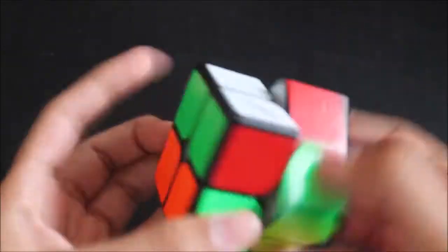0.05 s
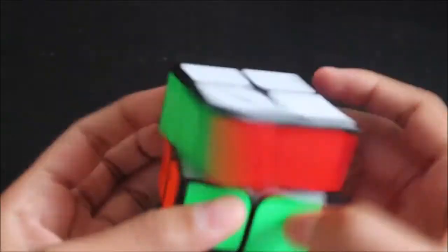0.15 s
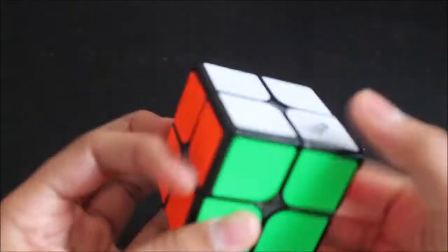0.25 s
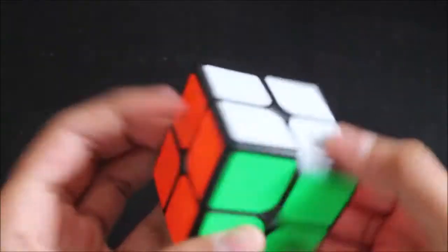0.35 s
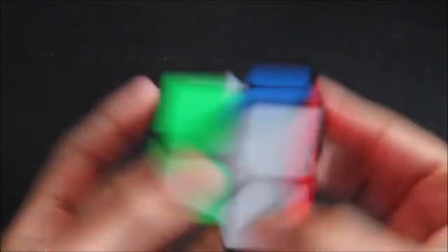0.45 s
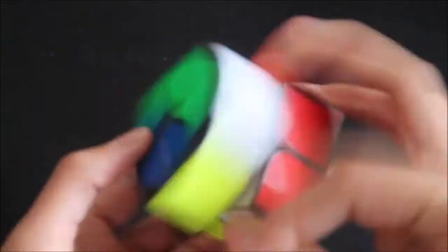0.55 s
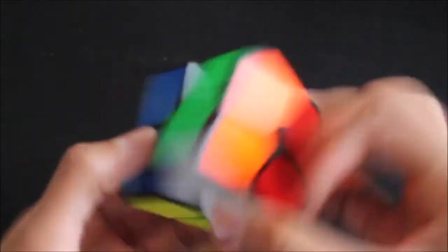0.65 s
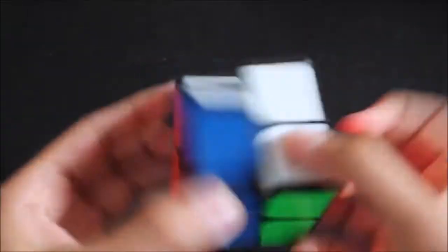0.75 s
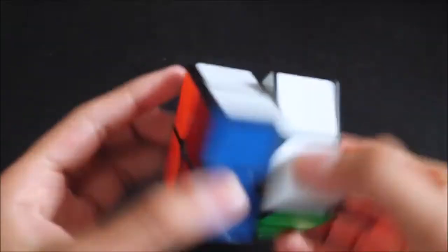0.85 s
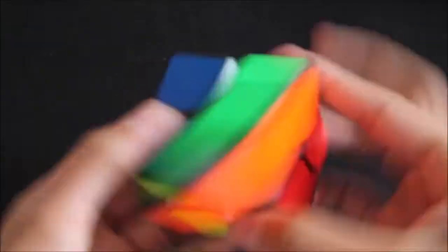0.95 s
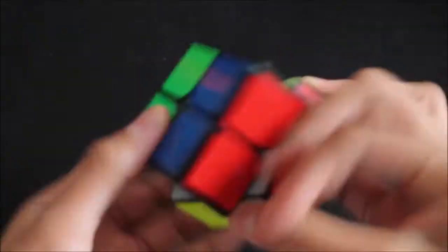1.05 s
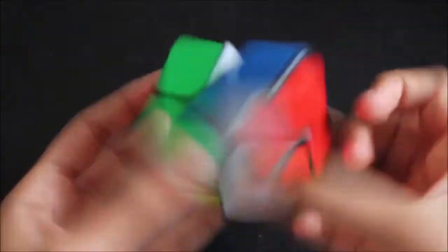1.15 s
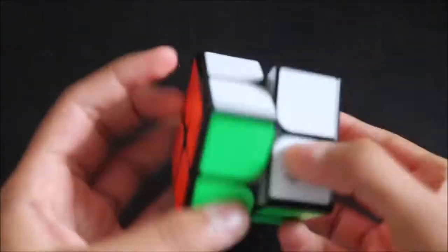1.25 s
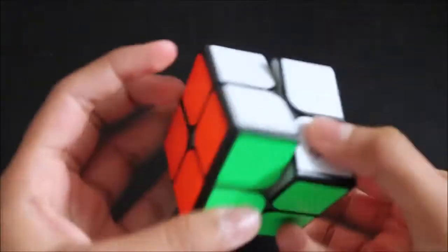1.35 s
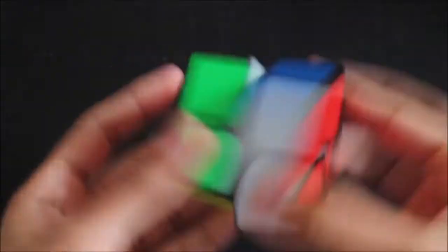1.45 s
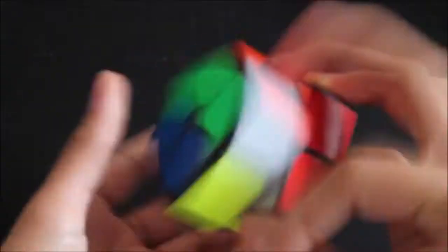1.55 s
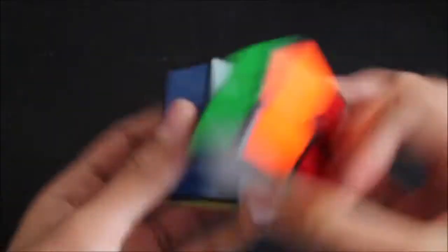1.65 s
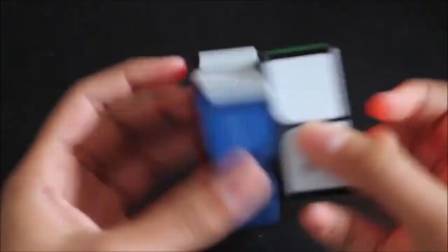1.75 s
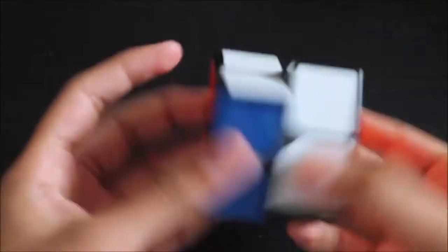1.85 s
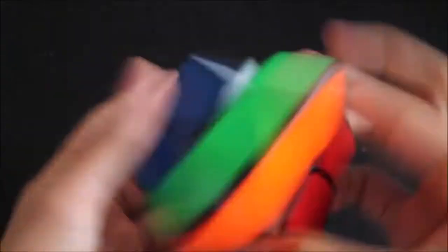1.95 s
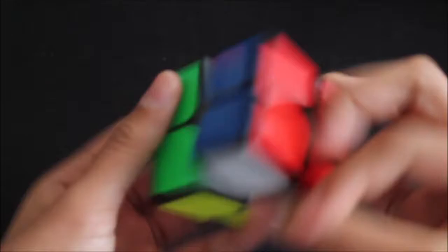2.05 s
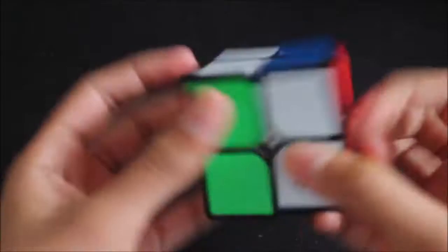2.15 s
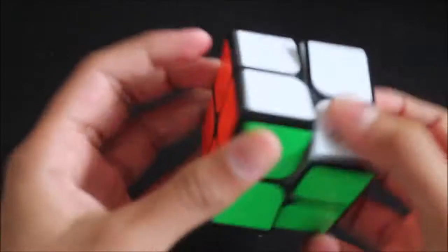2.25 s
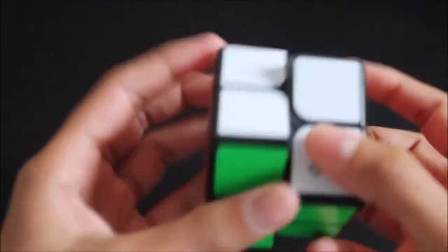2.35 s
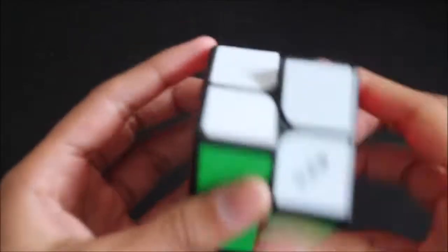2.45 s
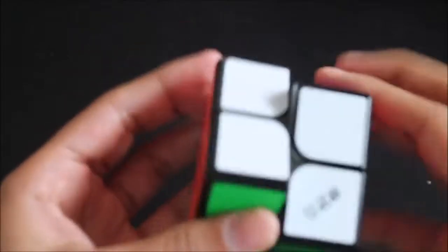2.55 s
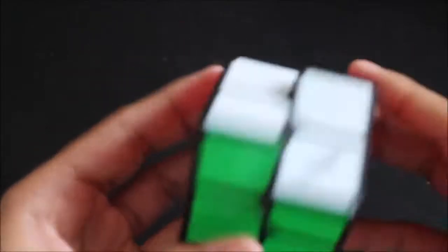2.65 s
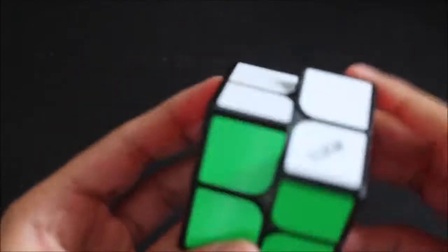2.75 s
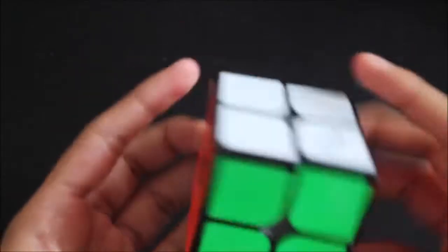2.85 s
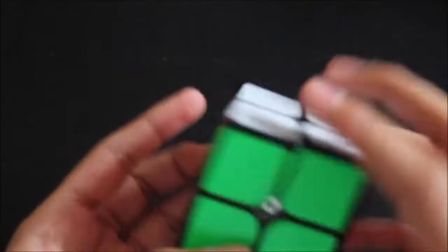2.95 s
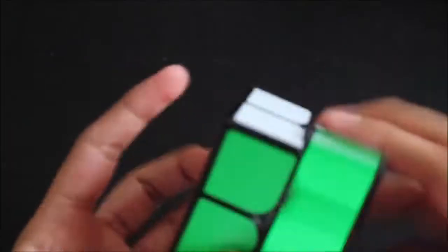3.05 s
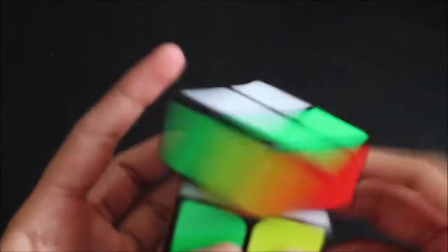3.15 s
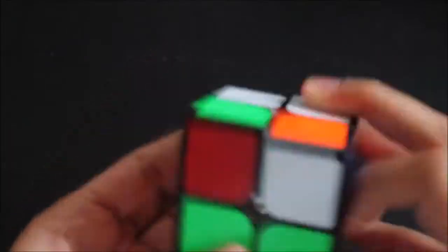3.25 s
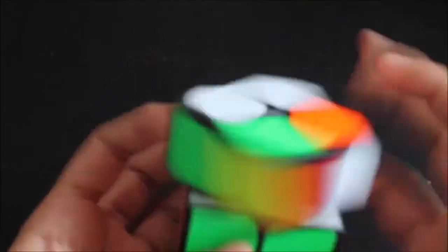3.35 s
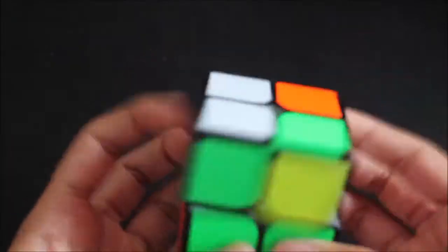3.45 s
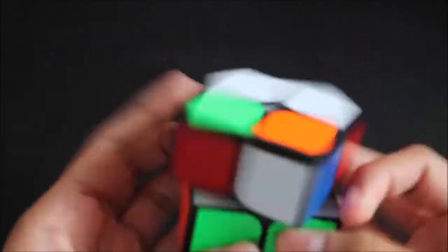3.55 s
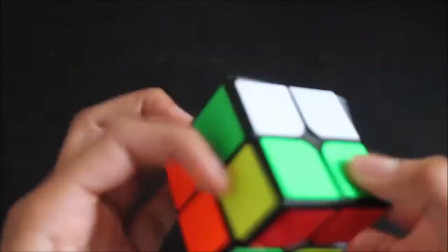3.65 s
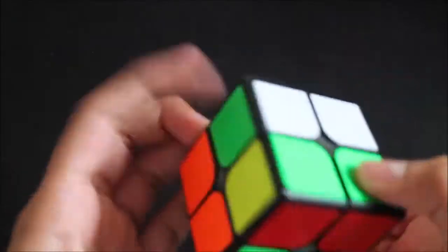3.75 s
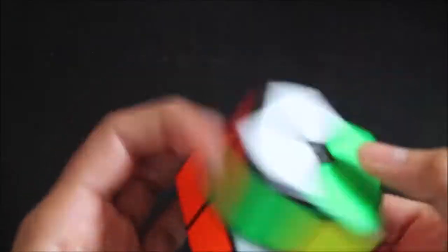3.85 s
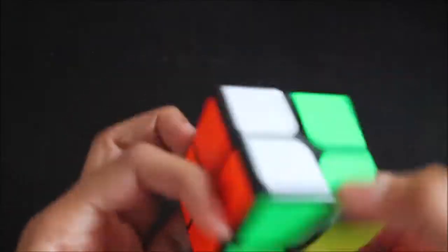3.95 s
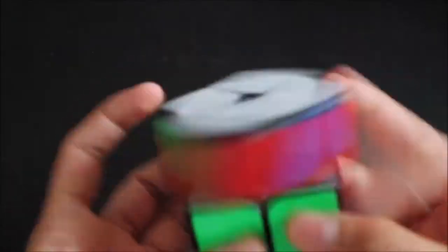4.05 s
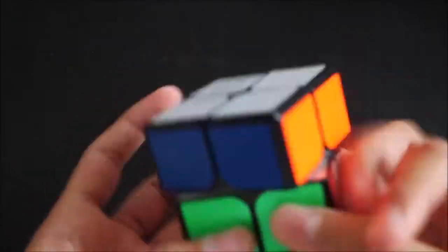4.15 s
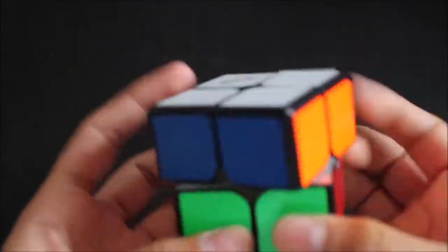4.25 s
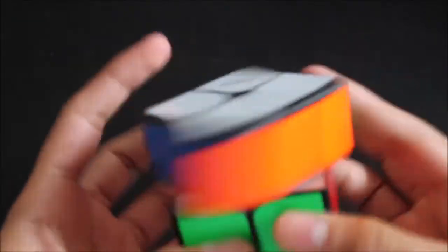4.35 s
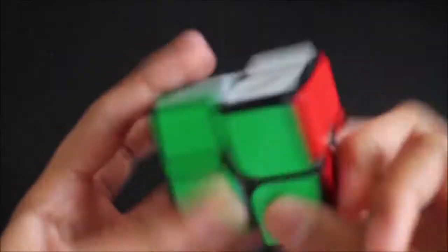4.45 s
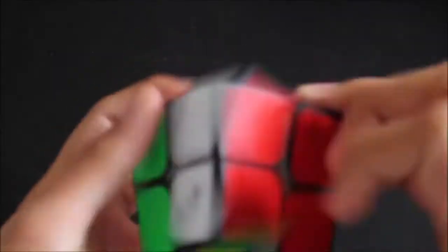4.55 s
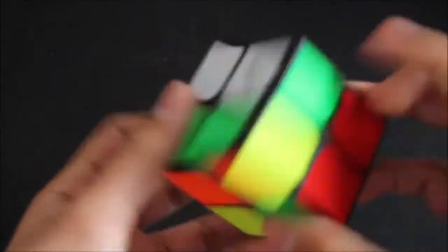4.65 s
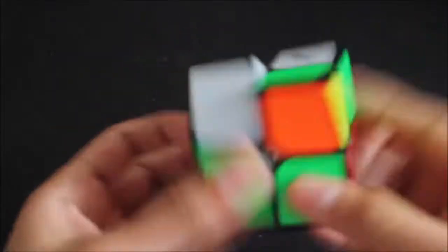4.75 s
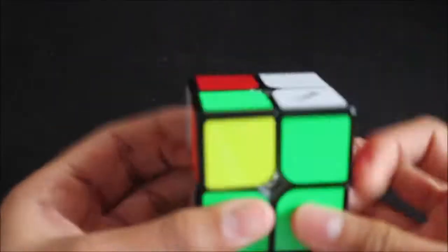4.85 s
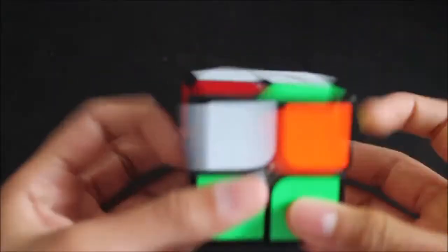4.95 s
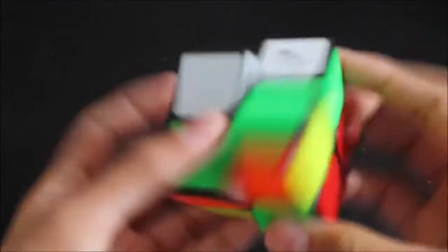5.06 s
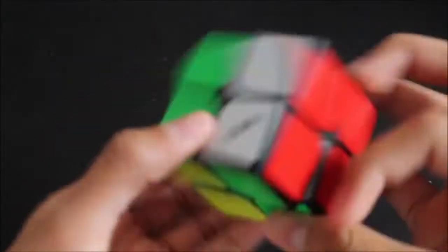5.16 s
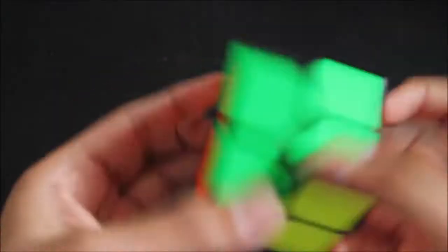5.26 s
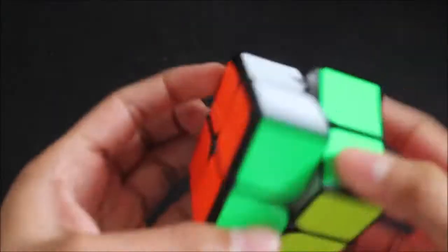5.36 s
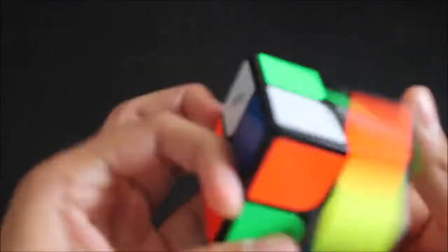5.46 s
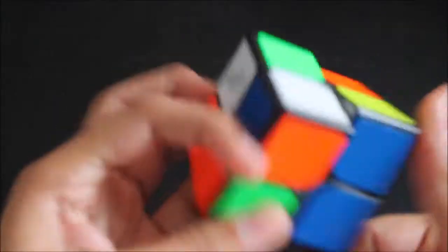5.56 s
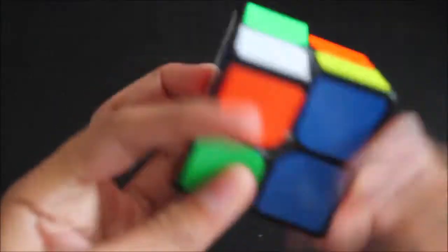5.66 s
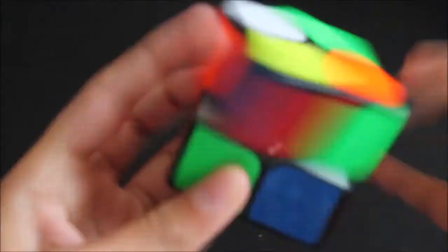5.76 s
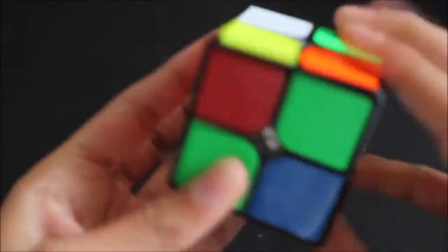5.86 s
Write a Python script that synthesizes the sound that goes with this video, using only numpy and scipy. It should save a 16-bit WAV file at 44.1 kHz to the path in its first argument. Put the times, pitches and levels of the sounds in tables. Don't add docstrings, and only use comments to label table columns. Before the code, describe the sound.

Hard plastic puzzle cube turned fast by hand, loud snaps and rattling clicks with short dry scrapes, close up in a bare echoing room.

```python
import sys
import numpy as np
from scipy import signal
from scipy.fft import rfft, irfft, dct
from scipy.io import wavfile
from scipy.ndimage import uniform_filter1d

SR = 44100
rng = np.random.default_rng(int(sys.argv[2]) if len(sys.argv) > 2 else 0)


def amplitude_ratio(level_db):
    exponent = np.asarray(level_db, float) / 20
    return 10 ** exponent


def store_wav(level_fs):
    pcm = np.round(np.clip(np.atleast_2d(level_fs), -1, 1) * 32767)
    wavfile.write(sys.argv[1], SR, pcm.T.astype(np.int16))


N = 260190

# f/Hz, t60/ms, level/dB
HOLLOW_MODES = [(849, 13.9, -5), (907.8, 20.35, -0.5), (980.6, 23.7, -5.5), (1094, 10.1, -6)]
SHELL_MODES = [(1376, 11.3, -8.5), (1757, 9.6, -0.86), (1943, 14.1, -2.5), (2162, 6.3, -2.5)]
CRACK_MODES = [(3043, 5.5, -6.5), (3012, 6.46, -3), (3507, 5.6, 0.2), (3905, 6.84, -2), (4890, 2.56, 1),
               (5730, 7.1, -4), (6374, 3.4, -6.5)]
TICK_MODES = [(6800, 1.47, -1.5), (8440, 2.25, -1), (9160, 2.25, -4.5), (11130, 1.4, -8.5),
              (12530, 2.4, -12), (13600, 2.5, -16), (14600, 1.2, -10)]


def snaps():
    contacts = locks() + knocks() + clacks() + catches() + touches() + grazes()
    s, crack_db, hollow_db, shell_db, tick_db = np.array(contacts).T
    chance = rng.standard_normal((len(s), 1600))
    force = blows(chance[:, 64:])
    near, around = 0, 0
    groups = [(HOLLOW_MODES, hollow_db - 0.3), (SHELL_MODES, shell_db - 0.3),
              (CRACK_MODES, 0 * s), (TICK_MODES, tick_db + 7)]
    for k, (modes, rel_db) in enumerate(groups):
        grip = chance[:, 16 * k:16 * k + 16]
        part = signal.fftconvolve(ring(modes, grip), force, axes=1)
        peak = np.abs(part).max(axis=1, keepdims=True)
        part = part / peak * amplitude_ratio(crack_db + rel_db + 0.5)[:, None]
        near = near + part
        even = np.pad(ring(modes, 0.3 * grip), ((0, 0), (512, 1023)))
        energy_ratio = np.sum(part ** 2, axis=1) / np.sum(even ** 2, axis=1)
        around = around + even * np.sqrt(energy_ratio)[:, None]
    out = np.zeros((2, N + 4096))
    for start, a, b in zip((s * SR).astype(int), near, around):
        out[:, start:start + len(a)] += a, b
    return out[:, 512:N + 512]


# t/s, crack peak level/dB, hollow re crack/dB, shell re crack/dB
LOCKS = [(.0158, -16.5, 0, -2), (.601, -3.5, -3.5, -11.5), (0.6294, -15, 1, -3), (.993, -19, 0, 3),
         (1.0361, -4, -10.5, -5.5), (1.0548, -5.5, -7, -5), (1.081, -14, 0, -5), (1.0977, -8.5, -11, -12),
         (1.2166, -7.5, -6, -3), (1.234, -13.5, -7.5, -0.5), (1.5405, -17.5, -3.5, 2),
         (1.5849, -2.5, -7, -8), (1.6071, -8, -1.5, 1), (2.029, -17, -1, -4), (2.04, -5, -15, -3.5),
         (2.052, -5, -8, -3.5), (2.1064, -16.5, -3.5, -9), (2.1563, -17, -9.5, -4.5),
         (3.2172, -9.5, -3, -1), (3.287, -16.5, -7, -1.5), (3.4148, -15.5, -1.5, -5), (3.5904, -16, -3, -6),
         (3.6797, -17.5, 1, -11), (3.709, -2, -9, -6), (3.9279, -17.5, 0, -1), (4.1633, -13.5, -8, 5),
         (4.4616, -15, -2.5, -2.5), (4.6345, -10.5, -5, -4), (5.1965, -16.5, 0, -1.5),
         (5.8161, -9, -1.5, -4.5)]


def locks():
    return [(*row, -15) for row in LOCKS]


# t/s, crack peak level/dB, hollow re crack/dB
KNOCKS = [(.0357, -39.5, 9), (.0942, -36.5, 8.5), (.4386, -34.5, 5), (0.4536, -26, 6),
          (0.5483, -28.5, 10.5), (.6544, -23.5, 1.5), (.9552, -39, 10), (1.0315, -25, 6), (1.2685, -31, 5),
          (1.6449, -21, 4), (1.6588, -25, 8.5), (2.0888, -27, 10), (2.1393, -21.5, 1), (3.0735, -46, 6),
          (3.1198, -36.5, 8.5), (3.3344, -26, 6.5), (3.466, -36.5, 10.5), (3.6627, -24, 3),
          (3.6902, -39, 18), (3.7643, -33, 11), (3.8168, -39, 7), (3.856, -45.5, 11), (3.978, -46, 13),
          (4.14, -21, 2.5), (4.4168, -30, 6.5), (4.5432, -24, 6.5), (4.6735, -29.5, 9), (4.691, -44.5, 19),
          (5.1839, -21, 5), (5.314, -42, 15)]


def knocks():
    return [(s, db, hollow_db, hollow_db - 4, -12) for s, db, hollow_db in KNOCKS]


# t/s, crack peak level/dB, shell re crack/dB
CLACKS = [(.0276, -29, 2.5), (0.2526, -28.5, 2), (0.5276, -32.5, 8), (0.569, -28, 6), (0.5913, -24.5, 7),
          (0.6149, -21, 6.5), (.8185, -27, 6), (0.98, -36, 14.5), (1.0128, -30, 12.5), (1.072, -22, 10),
          (1.534, -25.5, 4), (1.5736, -20, 5), (1.7401, -24, 2.5), (1.978, -44.5, 20.5), (1.9893, -20.5, 7),
          (2.023, -25, 3), (2.069, -27.5, 13), (2.2201, -19, 1), (3.1949, -25, 3), (3.2547, -39.5, 19.5),
          (3.3145, -28.5, 5), (3.5689, -21, 1), (4.483, -27.5, 6.5), (4.8914, -20, 3), (4.9838, -25, 4.5),
          (5.2062, -27.5, 8), (5.295, -23.5, 7.5), (5.4872, -19.5, 5), (5.545, -31, 8), (5.806, -23, 2)]


def clacks():
    return [(s, db, shell_db - 5.5, shell_db, -15) for s, db, shell_db in CLACKS]


# t/s, crack peak level/dB, shell re crack/dB
CATCHES = [(.1747, -33, -13), (0.2366, -26.5, -0.5), (0.3891, -26.5, -1), (.67, -24, -4),
           (.7482, -22, -1.5), (0.7572, -24, 0.5), (1.2057, -21.5, 1.5), (2.1924, -26.5, 6.5),
           (2.257, -25, 4.5), (2.8441, -31, -9.5), (3.271, -20, -15), (3.699, -25, -12), (3.7337, -24.5, 2),
           (4.1218, -21, 1.5), (4.4293, -29, -16), (4.439, -24, -5), (4.5052, -22.5, -1), (4.589, -27, -4),
           (4.6236, -25, -16), (4.777, -28, 1), (4.809, -25.5, -6), (4.836, -37, 6), (4.877, -19.5, -2),
           (4.9045, -18.5, -2), (5.001, -24.5, -0.5), (5.345, -26.5, 1.5), (5.4129, -33, -3),
           (5.5294, -26, -4.5), (5.7539, -31, -3), (5.788, -23.5, 0.5)]


def catches():
    return [(s, db, shell_db - 2.5, shell_db, -13.5) for s, db, shell_db in CATCHES]


# t/s, crack peak level/dB
TOUCHES = [(.1055, -36), (0.163, -39), (0.1828, -37), (0.2002, -39), (0.4173, -44), (.7251, -32),
           (.8083, -30), (.9238, -38.5), (1.3779, -38.5), (1.4426, -36), (1.4732, -40), (1.9092, -41),
           (1.9395, -35), (2.294, -49), (2.6947, -48), (2.8652, -46), (2.9733, -53), (2.9892, -54),
           (3.008, -48), (3.0882, -40.5), (3.132, -46), (3.163, -36.5), (4.0438, -31), (4.0548, -32.5),
           (4.0781, -35.5), (4.3737, -48), (4.556, -35), (5.0759, -33), (5.1047, -33.5), (5.3279, -29)]


def touches():
    return [(s, db, 1, 6.5, -9) for s, db in TOUCHES]


# t/s, crack peak level/dB
GRAZES = [
    (0.9869, -22.5),
    (2.6635, -44),
    (2.7073, -43),
    (2.7734, -39.5),
    (3.917, -30),
    (4.398, -41),
    (4.4682, -25),
    (5.4942, -24.5),
]


def grazes():
    return [(s, db, -12, -12, -14.5) for s, db in GRAZES]


def blows(chance, lead=512):
    runup_ms, rebound_ms, chatter_ms = 4.2, 1.86, 6.5
    t_ms = (np.arange(chance.shape[1]) - lead) / SR * 1000
    after_ms = np.maximum(t_ms, 0)
    runup = chance ** 3 * np.exp(np.minimum(t_ms, 0) / runup_ms) * (t_ms < 0)
    rebounds = chance ** 5 * np.exp(-after_ms / rebound_ms) * (t_ms > 0)
    chatter = chance[:, ::-1] ** 3 * np.exp(-after_ms / chatter_ms) * (t_ms > 0)
    force = 0
    for stage, db in [(runup, -15), (rebounds, -7), (chatter, -21)]:
        force = force + amplitude_ratio(db) * stage / np.abs(stage).max(axis=1, keepdims=True)
    force[:, lead] = 1
    return force


def ring(modes, chance, detune=0.03, scatter_db=3, size=1500):
    hz, t60_ms, db = np.transpose(modes)
    t = np.arange(size) / SR
    hz = hz * (1 + detune * chance[:, :len(hz)])
    sign = (-1.0) ** np.arange(len(db))
    gain = amplitude_ratio(db + scatter_db * chance[:, -len(db):]) * sign
    fade = np.exp(-np.log(1000) * t / (t60_ms[:, None] / 1000))
    return np.einsum("em,emt,mt->et", gain, np.sin(2 * np.pi * hz[..., None] * t), fade)


def sliding():
    grains = rng.standard_normal(N) * amplitude_ratio(3.8 * np.minimum(rng.exponential(size=N), 7))
    grains = grains * amplitude_ratio(8.3 * walk(80))
    scrape = 0
    for modes, db in [(HOLLOW_MODES, -4), (SHELL_MODES, -4.5), (CRACK_MODES, -5), (TICK_MODES, -17)]:
        response = ring(modes, np.zeros((1, 16)))[0]
        scrape = scrape + level(signal.fftconvolve(grains, response)[:N], db)
    return amplitude_ratio(-5) * speed() * scrape


# t/s of top speed, scrape level/dB, spin-up/s
TURNS = [(0., -26.5, .1), (0.173, -37.5, 0.33), (.243, -31.5, 0.044), (.451, -37.5, 0.076),
         (0.608, -21, .11), (1.042, -20, 0.13), (1.223, -21, 0.063), (1.592, -16.5, 0.091),
         (2.049, -23, .13), (2.26, -36, 0.27), (2.86, -62, .03), (3.217, -32, 0.16), (3.418, -40, .06),
         (3.58, -28, .035), (3.714, -27.5, .08), (3.928, -27.5, .045), (4.12, -29, .03), (4.155, -26, 0.12),
         (4.433, -28, 0.045), (4.641, -38, .12), (4.893, -31, 0.28), (4.993, -37, .14), (5.196, -29.5, 0.2),
         (5.303, -28, 0.052), (5.534, -26.5, 0.19), (5.817, -26.5, 0.066)]


def speed():
    spin_db, coast_s = 25.5, 0.097
    grip_db, grip_s = -47.5, 0.35
    t, power = np.arange(N) / SR, 0
    since_s = np.full(N, np.inf)
    for s, db, spin_s in TURNS:
        away = np.where(t < s, (s - t) / spin_s, (t - s) / coast_s)
        power = power + amplitude_ratio(db - spin_db * away) ** 2
        since_s = np.minimum(since_s, np.where(t < s, np.inf, t - s))
    grip = amplitude_ratio(grip_db - spin_db * np.minimum(since_s, t) / grip_s)
    return np.sqrt(power + grip ** 2)


# f/Hz, t60/s, level/dB
ROOM = [(497.5, 0.83, 8), (1010, 0.77, -0.3), (2160, 0.82, 0.53), (3920, 0.76, -2), (7590, 0.66, -2.5),
        (14300, 0.32, 3)]


def room(x):
    gap_ms, rise_ms = 1.1, 4.1
    t = np.arange(int(1.2 * SR)) / SR
    noise, tail = rng.standard_normal(len(t)), 0
    for hz, t60, db in ROOM:
        octave = [(hz / 2.01, -60), (hz / 1.5, -6), (hz, 0), (hz * 1.5, -6), (hz * 2.01, -60)]
        tail = tail + amplitude_ratio(db - 60 * t / t60) * colour(noise, octave)
    tail = tail * np.clip((t * 1000 - gap_ms) / rise_ms, 0, 1)
    return signal.fftconvolve(x, amplitude_ratio(-6) * tail / np.sqrt(np.sum(tail ** 2)))[:N]


# t/s, level/dB
DRONE = [
    (1.55, -74),
    (1.8, -48.5),
    (2.2, -59),
    (2.4, -77),
]


def drone():
    tone = level(colour(rng.standard_normal(N), [(280, -30), (350, -2), (480, 0), (650, -25)]), 0)
    s, db = np.transpose(DRONE)
    return tone * amplitude_ratio(np.interp(np.arange(N) / SR, s, db))


# f/Hz, level/dB per Hz
HUM = [(20, -29), (41, -17), (100, -7.5), (135, -0.4), (170, -1), (206, -3), (263, -8), (384, -8.5),
       (624, -16), (1790, -17.5), (2690, -27), (5570, -28.5), (16000, -41)]


def hum():
    return level(colour(rng.standard_normal(N), HUM), -50.5) * amplitude_ratio(2.2 * walk(3.8))


def level(x, db):
    return x * amplitude_ratio(db) / np.sqrt(np.mean(x ** 2))


def colour(x, points):
    hz, db = np.transpose(points)
    axis_hz = np.maximum(np.fft.rfftfreq(len(x), 1 / SR), 1)
    gain = amplitude_ratio(np.interp(np.log(axis_hz), np.log(hz), db))
    return irfft(rfft(x) * gain, len(x))


def walk(rate):
    k = int(SR / rate)
    held = np.repeat(rng.standard_normal(N // k + 1), k)
    return 0.45 * uniform_filter1d(uniform_filter1d(held, k), k)[:N]


def scene():
    near, around = snaps() + sliding()
    cube = colour(near + room(around), [(100, -33), (400, -8.0), (620, -4.5), (780, 1.02)])
    return (cube + hum() + drone())[None]


# t/s, strongest lines kept, level/dB left of the rest
THINNED = [(.13, 60, -11), (1.197, 60, -14), (1.71, 40, -16), (2.264, 40, -14), (2.305, 40, -14),
           (2.517, 25, -18), (2.583, 20, -18), (3.477, 40, -14), (3.945, 25, -24), (4.862, 30, -18),
           (5.123, 30, -18), (5.235, 50, -30), (5.245, 50, -40), (5.378, 35, -18), (5.465, 25, -28),
           (5.59, 35, -15), (5.677, 35, -18)]


def thin_out(x, size=1600):
    y, window = x.copy(), signal.windows.tukey(size, 0.85)
    hz = np.arange(size) * SR / 2 / size
    favour = (hz + 100) ** 0.8 * (hz < 6600)
    for s, kept, left_db in THINNED:
        part = slice(int(s * SR) - size // 2, int(s * SR) + size // 2)
        lines = dct(y[part] * window, type=4, norm="ortho")
        weight = np.abs(lines) * favour
        weak = (weight < np.sort(weight)[-int(kept)]) & (hz > 450)
        y[part] -= (1 - amplitude_ratio(left_db)) * window * dct(lines * weak, type=4, norm="ortho")
    return y


def low_pass(x):
    return signal.sosfilt(signal.butter(12, 16510, fs=SR, output="sos"), x)


def record(dry):
    bent = np.clip(dry[0] - 0.053 * dry[0] ** 2, -0.86, 0.86)
    cut = signal.sosfilt(signal.ellip(8, 0.3, 60, 15900, fs=SR, output="sos"), bent)
    mix = thin_out(cut)[None]
    return low_pass(mix)


dry = scene()
out = record(dry)
store_wav(out)
```